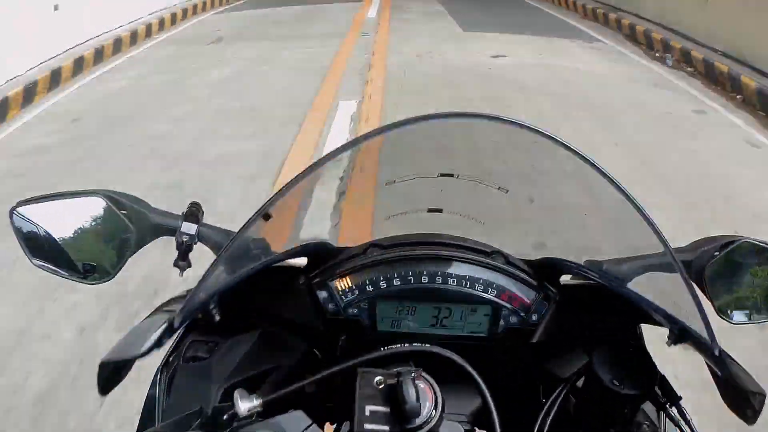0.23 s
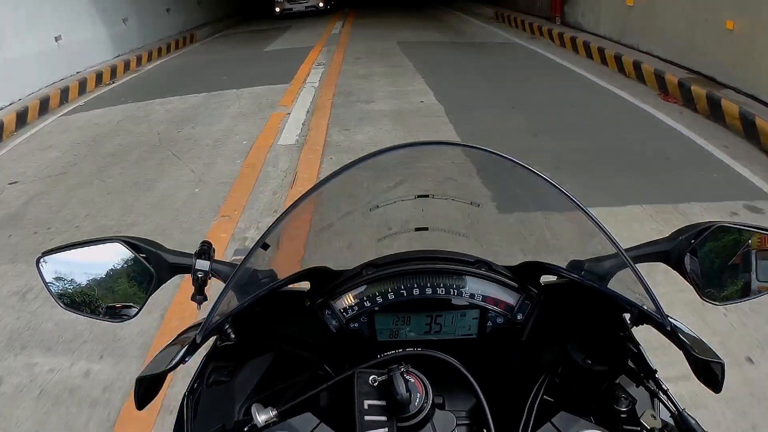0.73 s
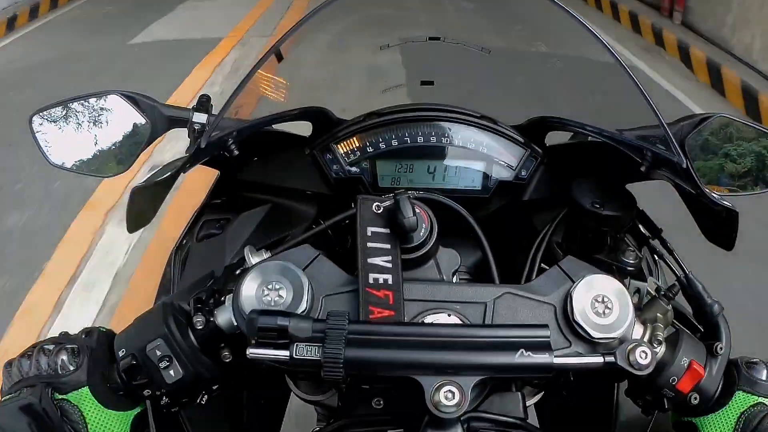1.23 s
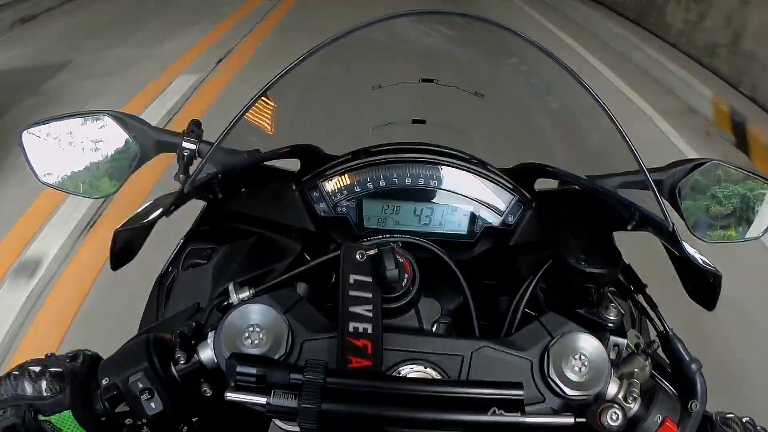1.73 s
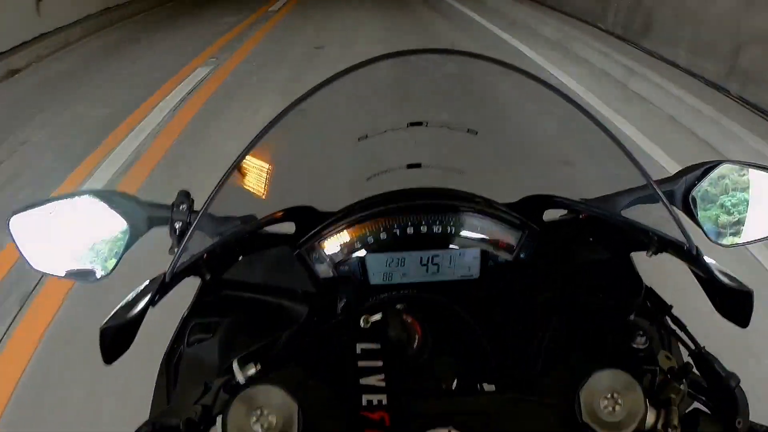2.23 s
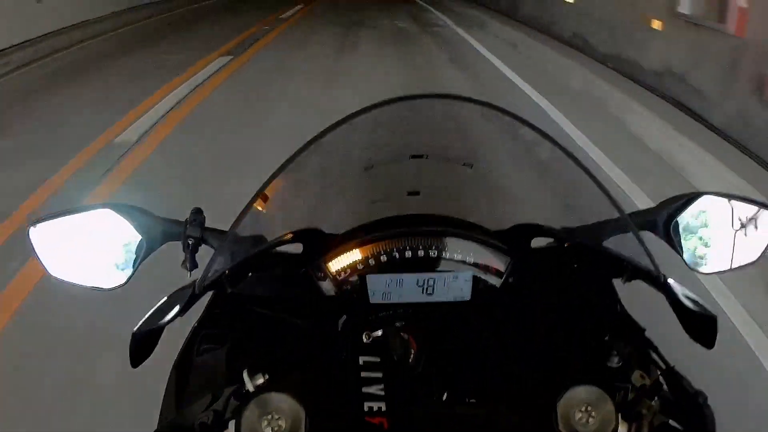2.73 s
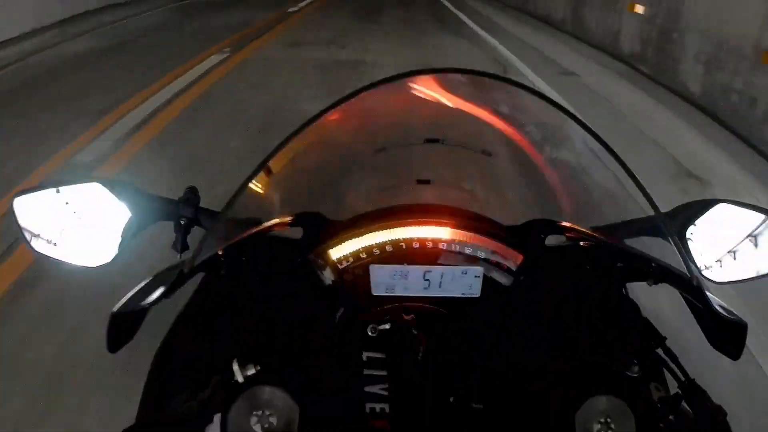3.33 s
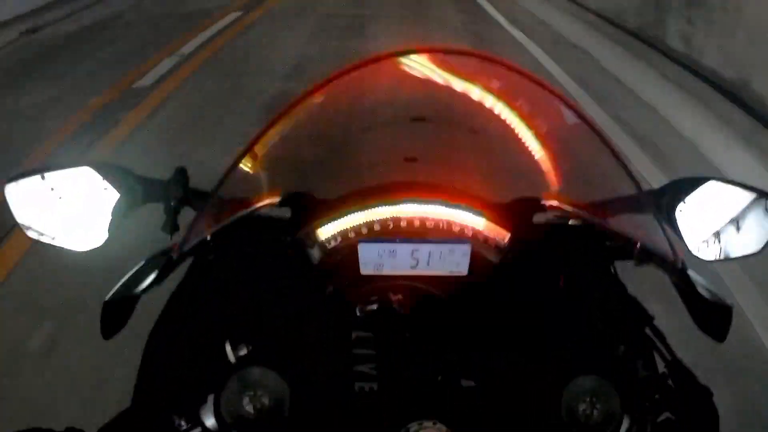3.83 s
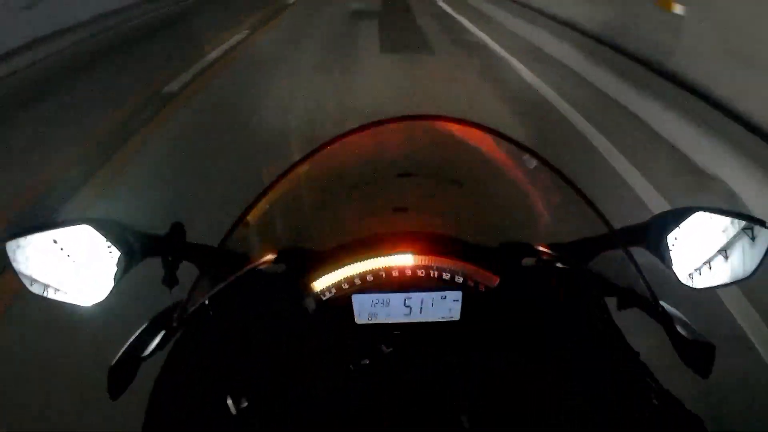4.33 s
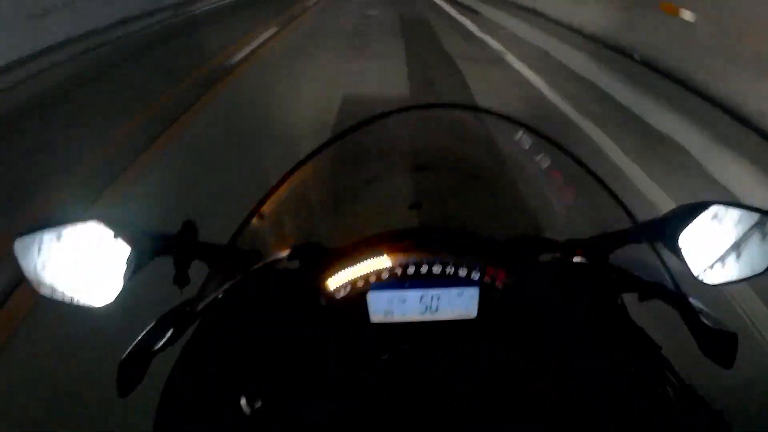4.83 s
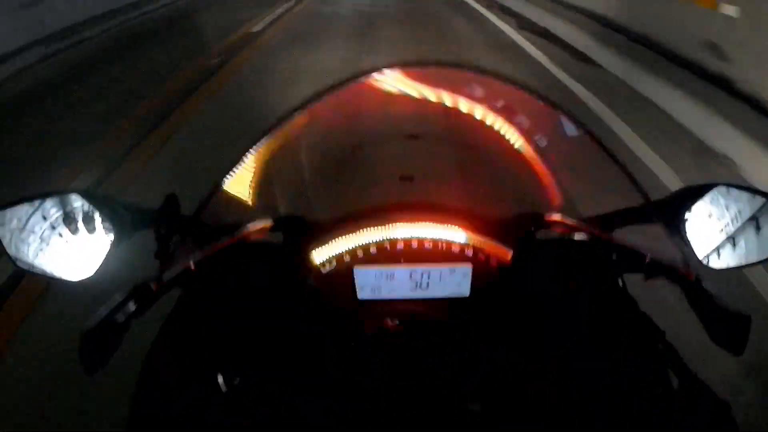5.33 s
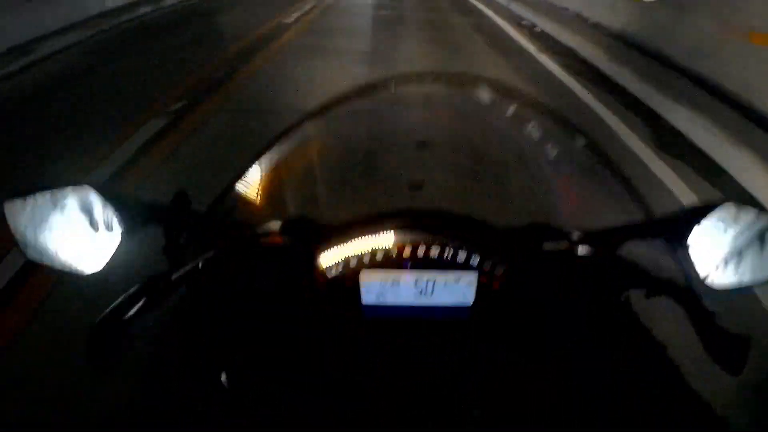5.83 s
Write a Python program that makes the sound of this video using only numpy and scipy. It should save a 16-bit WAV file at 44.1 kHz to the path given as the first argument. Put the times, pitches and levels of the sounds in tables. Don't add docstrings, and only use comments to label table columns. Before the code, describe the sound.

Close, overloaded motorcycle exhaust pulls, eases and pulls again, then screams in clutch-in revs with fuel pops, tunnel echo and buffeting wind.

```python
import sys
import numpy as np
from scipy import signal
from scipy.fft import rfft, irfft, next_fast_len
from scipy.io import wavfile
from scipy.ndimage import uniform_filter1d

SR = 44100
rng = np.random.default_rng(int(sys.argv[2]) if len(sys.argv) > 2 else 0)


def int16_out(signal):
    q = np.round(np.clip(np.atleast_2d(signal).T, -1, 1) * 32767)
    wavfile.write(sys.argv[1], SR, q.astype(np.int16))


def linear_from_db(decibels):
    return 10 ** (np.asarray(decibels, float) / 20)


N = 268789


def evened(x):
    return x / np.sqrt(np.mean(x ** 2) + 1e-20)


def steady(x, seconds):
    power = abs(uniform_filter1d(x ** 2, int(seconds * SR)))
    return x / np.sqrt(power + 1e-12)


def curve(rows):
    s, *columns = np.transpose(rows)
    return [np.interp(np.arange(N) / SR, s, column) for column in columns]


def bumps(rows):
    t = np.arange(N) / SR
    return sum(height * np.exp(-((t - s) / width) ** 2) for s, height, width in rows)


def read(points, hz):
    f, value = np.transpose(points)
    return np.interp(np.log(hz + 1), np.log(f + 1), value)


def noise(spectrum):
    size = next_fast_len(N)
    colour = linear_from_db(read(spectrum, np.fft.rfftfreq(size, 1 / SR)))
    return evened(irfft(rfft(rng.standard_normal(size)) * colour, size)[:N])


def wander(hz):
    return noise([(1, 0), (hz, -6), (4 * hz, -60)])


def resonate(x, hz, width):
    return signal.lfilter(*signal.iirpeak(hz, hz / width, SR), x)


def band(x, modes):
    return sum(linear_from_db(db) * evened(resonate(resonate(x, f, w), f, w)) for f, w, db in modes)


def exhaust_blows(turns):
    cylinder_db = [1.5, -5, 0.5, -2]
    # frequency in Hz, width in Hz, level in dB.
    pipe_modes = [(375.5, 27, -4), (419, 83, -11), (211.6, 69, -7)]
    count = np.maximum.accumulate(np.floor(turns + .02 * wander(60)))
    fired = np.diff(count, prepend=count[0]) > 0
    strength_db = np.take(cylinder_db, count.astype(int) % len(cylinder_db))
    clicks = fired * linear_from_db(strength_db + 2.82 * rng.standard_normal(N))
    t = np.arange(-300, 301) / SR
    dip = -np.exp(-(t / np.where(t < 0, .0013, .0005)) ** 2)
    blows = signal.oaconvolve(clicks, dip, "same")
    gate = steady(blows, 0.29)
    blows = signal.lfilter(*signal.butter(1, 45, "high", fs=SR), blows)
    ringing = sum(linear_from_db(db + 4.0) * resonate(blows, f, w) for f, w, db in pipe_modes)
    return steady(blows + ringing, 0.03), gate


def firing_tone(turns):
    phase = turns + 0.068 + 0.03 * wander(29.0)
    return -linear_from_db(3.65 * wander(25.8)) * np.cos(2 * np.pi * phase)


def engine_orders(turns, hz):
    # multiple of the firing rate, level in dB.
    order_levels = [(.5, -11), (1.5, -11), (2, 1), (2.5, -5), (3, 0.5), (4, -5.5)]
    # frequency in Hz, gain in dB.
    pipe_gain = [(150, -6), (250, -3.5), (420, 2.5), (520, -6), (650, -6.5), (850, -2.5), (1100, -2),
                 (1350, -9), (1900, -5)]
    total = 0
    for multiple, db in order_levels:
        level = linear_from_db(db + read(pipe_gain, multiple * hz) + 4 * wander(15))
        total = total - level * np.cos(2 * np.pi * multiple * (turns + 0.035 * wander(26)))
    return total


def gas_rasp(gate):
    # frequency in Hz, width in Hz, level in dB.
    can_modes = [(790, 600, -21), (1390, 1030, -22.5), (2170, 3900, -32), (4280, 20000, -73)]
    return band(rng.standard_normal(N) * (.9 - gate), can_modes)


def engine_roar(turns, cutting):
    # frequency in Hz, level in dB.
    roar_colour = [(40, -45), (120, 0), (200, 4.5), (400, -3), (470, -4.5), (540, -18), (1200, -13.5),
                   (3000, -21.5), (8000, -70)]
    stumble = cutting * linear_from_db(-3.0 + 9.0 * wander(10.5)) * np.cos(np.pi * turns + 0.86 * wander(30.6))
    swell = 1 + .5 * np.cos(2 * np.pi * turns)
    return stumble + linear_from_db(1.3 * wander(27.0)) * noise(roar_colour) * swell


def pipe_howl():
    # frequency in Hz, width in Hz, level in dB.
    blown_modes = [(352.5, 34.5, 1.5), (419.3, 64.3, -2.5)]
    return band(rng.standard_normal(N), blown_modes)


def exhaust(hz, blow_db, tone_db, orders_db, rasp_db, roar_db, howl_db):
    limiter_hz = 440.1
    cutting = np.clip((hz - limiter_hz) / 12, 0, 1)
    turns = np.cumsum(hz * (1 + .008 * cutting * wander(14))) / SR
    blows, gate = exhaust_blows(turns)
    engine = linear_from_db(blow_db) * blows
    engine = engine + linear_from_db(tone_db) * firing_tone(turns)
    engine = engine + linear_from_db(orders_db) * engine_orders(turns, hz)
    engine = engine + linear_from_db(rasp_db) * gas_rasp(gate)
    engine = engine + linear_from_db(roar_db) * engine_roar(turns, cutting)
    return engine + linear_from_db(howl_db) * pipe_howl()


def surges_db():
    # start in seconds, jump in dB.
    throttle_bites = [(0.08, 0), (0.125, 4.5), (1.047, 3.5), (1.087, 3), (1.158, -1.5), (1.303, -0.5),
                      (1.41, 5.5), (1.483, 7), (1.531, 4), (1.653, 13), (1.704, 7), (1.764, 6.5),
                      (1.806, 0.5), (1.885, -1.5), (2.012, 4.5), (2.073, 6), (2.771, 1), (3.101, 12),
                      (3.633, 5), (5.796, 4)]
    t = np.arange(N) / SR
    return sum(jump_db * (t >= s) * np.exp(-np.maximum(t - s, 0) / 0.018) for s, jump_db in throttle_bites)


def pops():
    # time in seconds, level in dB, push 1 or pull -1.
    fuel_pops = [(3.226, 7.5, 1), (3.304, 6, 1), (3.372, 1, 1), (3.426, 3, 1), (3.581, 6.5, 1),
                 (3.628, 10.5, -1), (3.961, 8, 1), (3.977, 1.5, 1), (4.173, 7, 1), (5.797, 19, 1),
                 (5.835, -6, 1), (5.846, 7, -1), (5.874, 8.5, 1), (5.908, -6, 1), (5.921, 1.5, -1)]
    clicks = np.zeros(N)
    for s, db, sign in fuel_pops:
        clicks[round(s * SR)] = linear_from_db(db) * np.sign(sign)
    t = np.arange(2000) / SR
    push = 1.78 * np.sin(2 * np.pi * 62 * t) * np.exp(-t / 0.0037)
    return signal.oaconvolve(clicks, push)[:N]


def tunnel(x):
    # frequency in Hz, time to fall 60 dB in seconds.
    decay_times = [(100, 0.9), (400, 1.13), (900, 0.93), (4000, 0.53)]
    taps = np.zeros(SR)
    at = np.arange(700, SR - 20, 20)
    taps[at + rng.integers(0, 20, len(at))] = rng.choice([-1., 1.], len(at))
    hz, t, z = signal.stft(taps, SR, nperseg=512)
    decay = linear_from_db(-60 * t / read(decay_times, hz)[:, None])
    tail = signal.istft(z * decay, SR, nperseg=512)[1]
    return signal.fftconvolve(x, tail / np.linalg.norm(tail))[:N]


def wind(level_db):
    # frequency in Hz, level in dB.
    wind_colour = [(15, -12), (40, 2), (70, -2.5), (150, -3), (400, -14), (1500, -63), (6000, -98)]
    # centre in seconds, lift in dB, half width in seconds.
    gust_lifts = [
        (.12, 20.5, 0.032),
        (1.4, 10.5, 0.18),
        (1.9, 12.5, 0.34),
        (2.9, 18.5, 0.16),
        (4.85, 0, 0.076),
        (5.17, -6, 0.044),
        (5.55, -6, 0.1),
        (5.88, 21, 0.096),
    ]
    return linear_from_db(level_db + bumps(gust_lifts) + 3 * wander(10)) * noise(wind_colour)


def states(hz, pressure_db):
    clutch_s, eased_db, eased_span_db = 3.04, -4, 5
    climb_hz_per_s, coast_hz_per_s = 910, 160
    free = np.clip((np.arange(N) / SR - clutch_s) / 0.069, 0, 1)
    geared = 1 - free
    eased = np.clip((eased_db - pressure_db) / eased_span_db, 0, 1)
    slope = uniform_filter1d(np.gradient(hz) * SR, 3000)
    climb = np.clip(slope / climb_hz_per_s, 0, 1)
    coast = np.clip(-slope / coast_hz_per_s, 0, 1)
    return np.array([geared * (1 - eased), geared * eased, free * climb, free * (1 - climb - coast), free * coast])


def layer_levels(shares):
    blows_levels = (1, 0.5, -7.5, -4, -6)
    tone_levels = (-3.5, -8.5, 0, 0, -0.5)
    upper_levels = (-10.5, -25, -4.5, -3, -10.5)
    rasp_levels = (8.4, 1.2, 7.9, 15.2, 3.9)
    roar_levels = (-7.5, -11, -6.5, -3.5, -5)
    howl_levels = (-8.5, -11, -14.5, -12.5, -3.5)
    echo_levels = (-11, -12.5, -10, -10.5, -3.5)
    wind_levels = (-15, -10, -20.5, -10.5, -9.5)
    roof_changes = (2, 2.5, 5, -0.5, -1.5, -3, 2.5, 3)
    roof_s = 1.9
    inside = shares[0] * np.clip((np.arange(N) / SR - roof_s) / .3, 0, 1)
    levels = np.array([blows_levels, tone_levels, upper_levels, rasp_levels,
                       roar_levels, howl_levels, echo_levels, wind_levels])
    return levels @ shares + np.outer(roof_changes, inside)


def helmet_microphone(mix):
    vented = signal.lfilter(*signal.butter(2, 38, "high", fs=SR), mix)
    lopsided = -np.exp(-.35 * np.clip(vented, -3, 3))
    centred = lopsided - uniform_filter1d(lopsided, 1500)
    return signal.lfilter(*signal.butter(3, 4800, fs=SR), centred)


def scene():
    # time in seconds, firing rate in Hz, pressure in dB, tone prominence in dB.
    cruise_rows = [
        (0, 85.46, 4, -1.5),
        (.56, 98.42, 3, -2),
        (.88, 104.5, -1, -1),
        (.97, 106.4, -8, -4.5),
        (1.44, 113.4, -12, 6),
        (1.93, 118.1, -8.5, 5.5),
        (2.27, 121.1, 1, -4.5),
        (2.72, 140, 7, 1),
        (2.86, 131.8, 4, -1.5),
    ]
    rev_rows = [
        [(3.03, 138, -1.5, 0.5), (3.1, 187, -1.5, 2), (3.19, 325, 6, 2), (3.27, 427, 21, 6.5),
         (3.32, 453, 11, 1), (3.92, 456, 14.5, -1.5), (4.14, 357.4, 13, 1.5), (4.41, 264.3, 9.5, 0.5),
         (4.65, 201.5, 4.5, 6)],
        [(4.71, 203, 2, 5), (4.8, 283, 7.5, 2), (4.92, 412, 14.5, 0.5), (4.98, 444, 10.5, -3),
         (5.06, 450, 6, -6), (5.19, 417.4, 12, 1.5), (5.41, 328, 11.5, 0.5), (5.7, 254.7, 7, 1.5),
         (5.82, 196.4, 8, 3.5)],
        [(5.84, 202, 8, 3), (5.99, 334.5, 8.5, -3), (6.09, 421, 18, 4)],
    ]
    # centre in seconds,
    # change in dB, half width in seconds.
    pressure_rows = [(.05, -19, 0.085), (.35, -12, 0.04), (.41, -8.5, 0.026), (.495, -11, 0.042),
                     (.614, -6.5, 0.027), (.783, -4, 0.03), (.955, -7.5, 0.019), (1.462, 12.5, 0.034),
                     (1.512, -8.5, 0.018), (1.55, 11.5, 0.033), (1.756, -2, 0.028), (1.82, 9, 0.02),
                     (1.906, 9.5, 0.028), (1.971, -18, 0.031), (2.06, -14, 0.023), (2.749, -21, 0.033),
                     (2.918, -6, 0.014), (3.043, -10, 0.022), (3.095, -10.5, 0.016), (3.397, 5, 0.014),
                     (2.8, -6.5, 0.021), (3.766, -5.5, 0.18), (4.23, -6.5, 0.07), (4.4, -9, .01),
                     (5.298, -3.5, 0.014), (5.56, -1, 0.0098),
                     (3.342, -16, .014),
        (3.44, -14, .013),
        (3.602, -13, .014),
        (4.736, -13, .009),
        (5.098, -8, .01),
        (5.745, -10, .008),
        (5.783, -17, .016),
    ]
    # centre in seconds, change in dB, half width in seconds.
    fade_rows = [(1.2, 3.5, 0.065), (1.27, -12, 0.058), (2.62, -5.5, 0.026), (2.96, -7.5, 0.067),
                 (3.0, 4, 0.021), (3.14, -1.5, 0.015), (3.7, -15.5, 0.041), (3.92, -31, 0.042),
                 (4.02, 8.5, 0.047), (4.46, -2.5, 0.15), (4.75, -23, 0.029), (5.58, -20, 0.005),
                 (5.63, -0.5, 0.035), (5.83, -4, 0.014)]
    # centre in seconds, howl lift in dB, half width in seconds.
    sing_rows = [
        (.23, 7, 0.066),
        (.7, -2.5, .15),
        (2.75, -2, .1),
        (4.2, -4, .12),
        (4.45, 3, .1),
        (5.6, 3, .08),
    ]
    hz, slow_db, stands_db = curve(cruise_rows + sum(rev_rows, []))
    pressure_db = slow_db + bumps(pressure_rows)
    stands_db = stands_db + bumps(fade_rows)
    levels = layer_levels(states(hz, slow_db))
    blow_db, tone_db, orders_db, rasp_db, roar_db, howl_db, echo_db, wind_db = levels
    engine = exhaust(hz, blow_db + .5 * stands_db, tone_db + 1.38 * stands_db, orders_db,
                     rasp_db, roar_db, howl_db + bumps(sing_rows))
    mix = steady(engine + linear_from_db(echo_db) * tunnel(engine) + wind(wind_db), 0.03184)
    heard = steady(helmet_microphone(mix), 0.0356) + pops()
    pressure_db = pressure_db + uniform_filter1d(surges_db(), size=90) + 0.72 * wander(58)
    return (linear_from_db(pressure_db) * heard)[None]


def top_cut(x):
    return signal.sosfilt(signal.butter(12, 15900, fs=SR, output="sos"), x)


def record(dry):
    # centre in seconds, rail lift, half width in seconds.
    bias_lifts = [
        (.2, .08, .15),
        (2.9, .07, .15),
        (4.7, .08, .25),
        (6.0, .13, .17),
    ]
    lower_rail, upper_rail = -.72, .63
    rail_sag, sag_s = .13, .25
    overload = uniform_filter1d(1. * (abs(dry) > upper_rail), int(sag_s * SR))
    railed = np.clip(dry, lower_rail, upper_rail - rail_sag * overload + bumps(bias_lifts))
    lowpass = signal.firwin(511, 15700, window=("kaiser", 8), fs=SR)
    limited = signal.oaconvolve(railed, lowpass[None], "same")
    return top_cut(limited)


dry = scene()
out = record(dry)
int16_out(out)
```